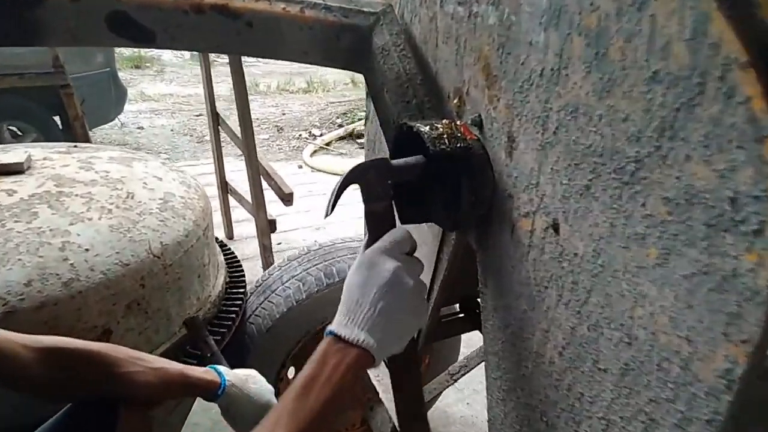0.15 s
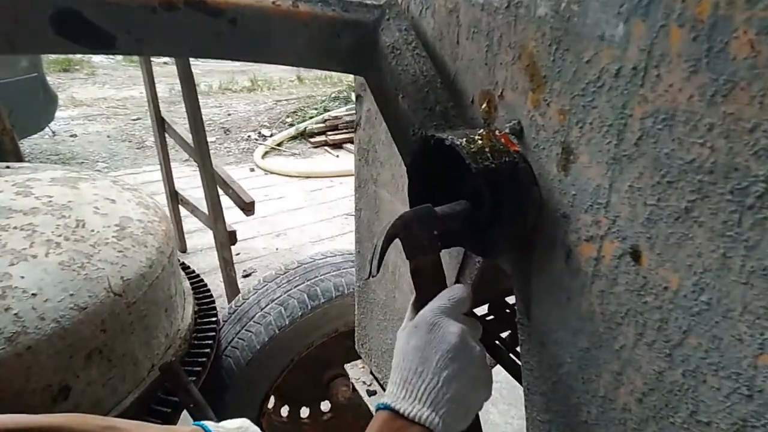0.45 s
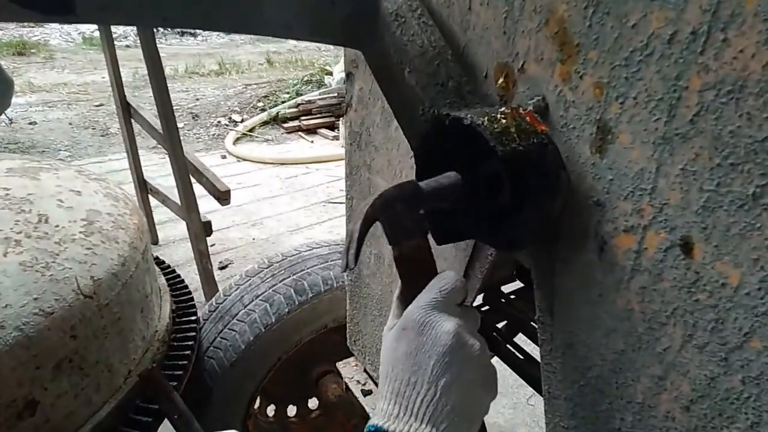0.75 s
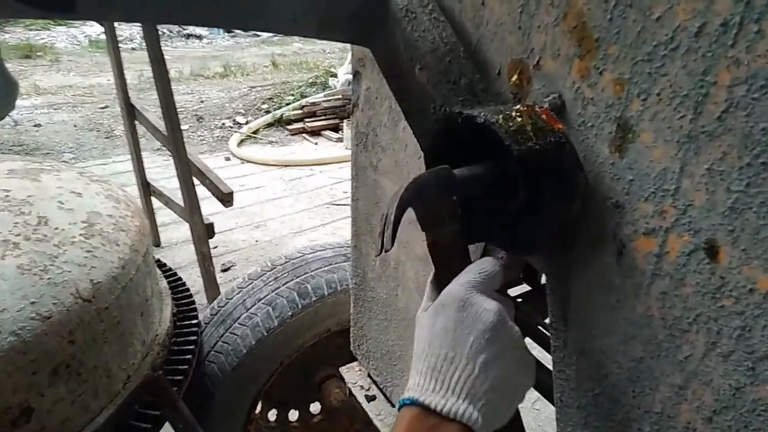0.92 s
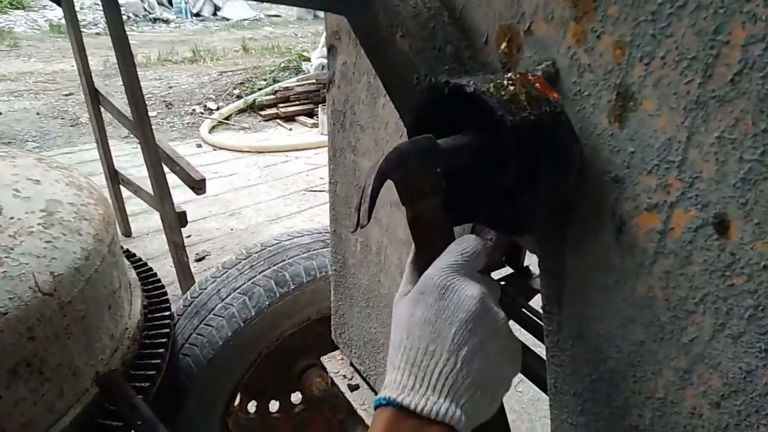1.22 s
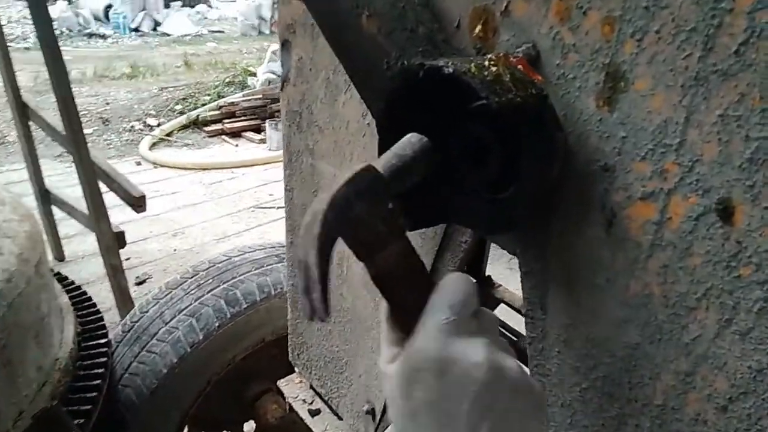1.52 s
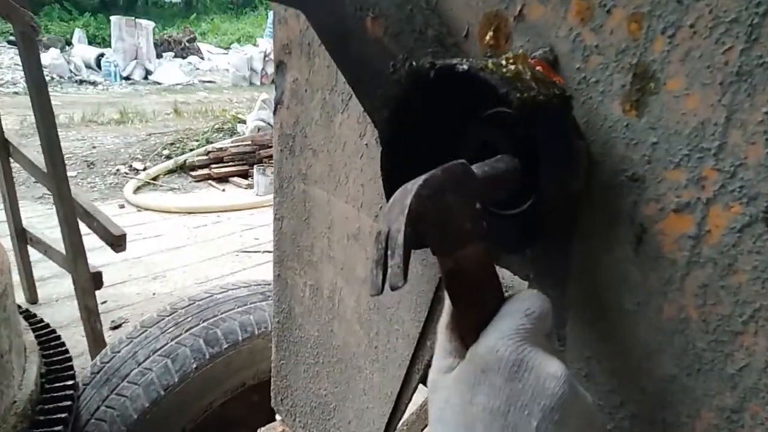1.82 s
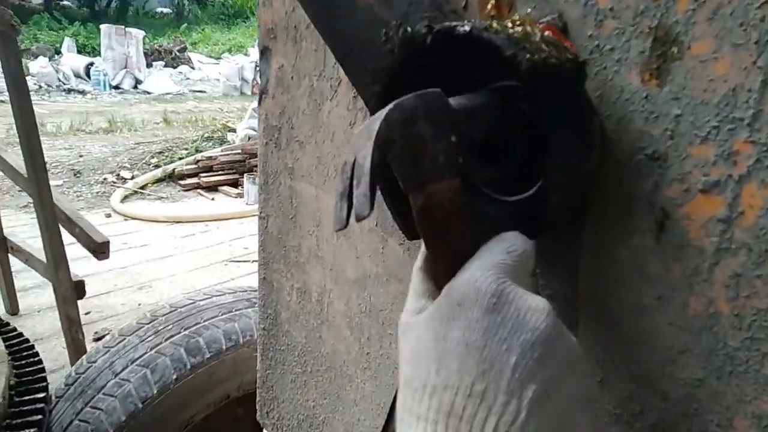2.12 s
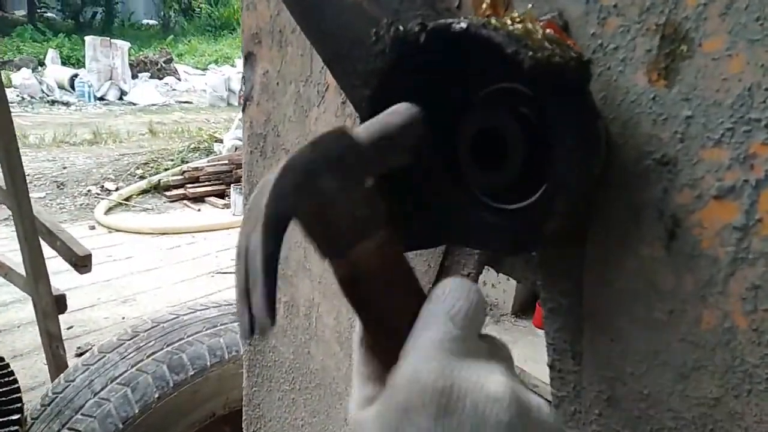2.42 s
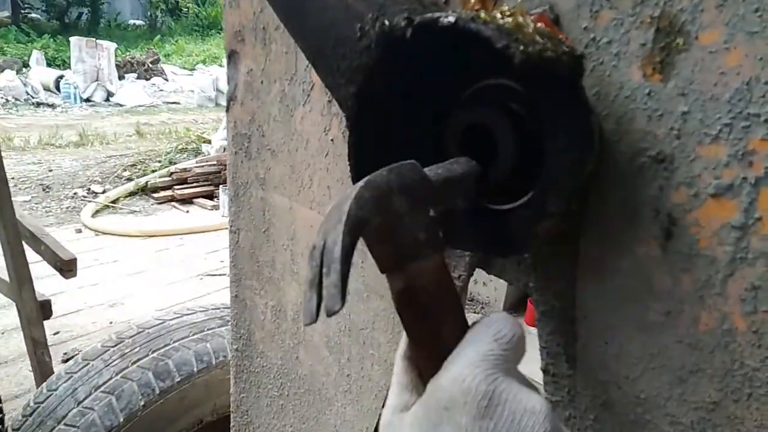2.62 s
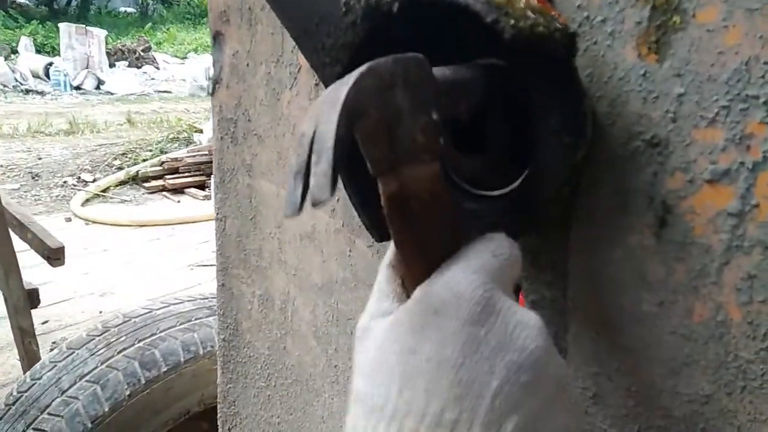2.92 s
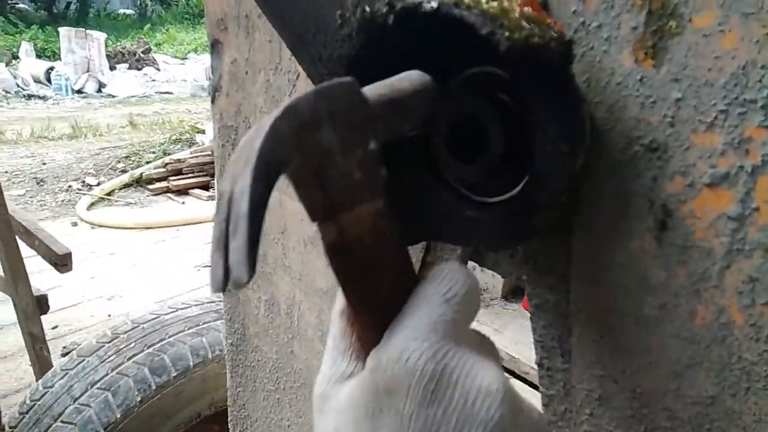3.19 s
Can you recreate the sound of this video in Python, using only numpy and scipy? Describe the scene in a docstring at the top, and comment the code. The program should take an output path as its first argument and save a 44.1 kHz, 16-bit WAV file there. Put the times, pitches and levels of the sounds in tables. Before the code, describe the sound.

A hammer drives a bearing into a steel housing with six sharp, clanging blows, each ringing briefly. The last ones come faster and add a high, pure note. Faint ticks and low outdoor rumble lie between them, heard close up.

```python
"""An outdoor yard, microphone hand-held close to a machine: a claw hammer drives a bearing into its housing.
We come in on the ring of one blow and six more follow. Each cracks, clangs in the steel housing,
buzzes the bearing's cage and sets the machine's plate wall booming; as the bearing seats, its race sings.
Loose steel ticks between the blows over a low rumble, the microphone takes three dull bumps,
and a limiter flattens every blow."""
import sys
import numpy as np
from scipy import signal
from scipy.fft import rfft, irfft, next_fast_len
from scipy.io import wavfile
from scipy.ndimage import uniform_filter1d, minimum_filter1d, map_coordinates

SR = 44100
rng = np.random.default_rng(int(sys.argv[2]) if len(sys.argv) > 2 else 0)


def waveform_to_disk(signal):
    """Save audio, clipped to [-1, 1], as 16-bit WAV at the path in sys.argv[1]."""
    frames = np.transpose(np.atleast_2d(signal))
    scaled = np.clip(frames, -1, 1) * 32767
    samples = np.round(scaled).astype(np.int16)
    wavfile.write(sys.argv[1], SR, samples)


N = 147735
T = np.arange(int(1.3 * SR)) / SR  # time since a contact [s]

# hammer blows, levels relative (time [s], strength [dB], clang [dB], boom [dB], bass [dB],
# brightness [dB], cage buzz [dB], bearing race [dB])
BLOWS = [(-.23, -5, 0, 6, -15.5, 1.5, -21, -73.5), (0.3562, -7, -11.5, 4.5, -6, -1, -18, -70),
         (0.9324, -4, -9, 3.5, -3.5, -3, -25, -62), (1.5938, -7, -10.5, 5, 1.5, -2, -22.5, -57.5),
         (2.1002, -5.5, -9, 3, 2, -3, -24.5, -28.5), (2.5061, -0.5, -9, 6, 2, -3, -20.5, -18),
         (2.8929, -6, -12, 2.5, 5.5, -3, -26, -14)]


def amp(db):
    """Decibels to gain."""
    return 10 ** (np.asarray(db) / 20)


def along(points, hz):
    """Read (frequency [Hz], value) points on a log frequency axis."""
    freqs, values = np.transpose(points)
    return np.interp(np.log(hz + 1), np.log(freqs + 1), values)


def filtered(x, response):
    """Filter x by a gain given as a function of frequency."""
    size = next_fast_len(len(x) + 8192)
    return irfft(rfft(x, size) * response(np.fft.rfftfreq(size, 1 / SR)), size)[:len(x)]


def noise(spectrum, size=len(T)):
    """Noise of rms 1, coloured by (frequency [Hz], level [dB]) points."""
    x = filtered(rng.standard_normal(size), lambda hz: amp(along(spectrum, hz)))
    return x / x.std()


def jitter(step):
    """A random line that takes a new course every step samples."""
    return np.interp(T, T[::step], rng.standard_normal(len(T[::step])))


def fade(t60, t=T):
    """A fall of 60 dB in t60 seconds."""
    return np.exp(-np.log(1000) * t / t60)


def mode(hz, t60):
    """One ringing partial at a random phase."""
    return np.sin(2 * np.pi * (hz * T + rng.random())) * fade(t60)


def add(track, at_s, sound):
    """Mix a sound in at a time that may lie before the start."""
    start = round(at_s * SR)
    part = sound[max(-start, 0):N - start]
    track[max(start, 0):][:len(part)] += part


def contact_crack():
    """The hammer face meets steel in a very short burst of treble."""
    # crack spectrum (frequency [Hz], level [dB])
    spectrum = [(500, -32), (4000, -20), (10000, 5), (15000, 21.5)]
    return amp(0.5) * noise(spectrum) * fade(t60=0.026)


def clang_ring(mode_hz, hold_s=0.015, scatter_db=5.5):
    """Many short steel modes, weighted anew by each blow and kept up briefly while the parts chatter."""
    # strength of the clang's modes (frequency [Hz], level [dB])
    spectrum = [(200, -2), (600, -7.5), (1050, 1), (1550, 3), (2300, -12), (3000, -8), (4400, -3),
                (5600, -12), (7200, -4.5), (8500, -0.5), (10500, -7.5), (13500, -3), (15500, -6)]
    t = T[:SR // 3]
    weight, phase = rng.standard_normal((2, len(mode_hz), 1))
    gains = amp(along(spectrum, mode_hz)[:, None] + scatter_db * weight)
    waves = np.sin(2 * np.pi * (mode_hz[:, None] * t + phase))
    ring = (gains * waves).sum(0) / np.sqrt(np.sum(gains ** 2) / 2)
    ring *= fade(t60=0.11, t=np.maximum(t - hold_s, 0))
    return np.pad(ring, (0, len(T) - len(t)))


def housing_ring():
    """The steel housing rings at the same pitches under every blow."""
    # housing modes (frequency [Hz], level [dB], t60 [s])
    modes = [(194, -33, 2.43), (513.5, -25, 1.07), (575, -27, 1.31), (727, -21.5, 0.93),
             (1029.5, -17, 0.65), (1060, -24, 0.92), (1580, -26.5, 0.74), (1682, -22, 0.57),
             (2200, -23.5, 0.24), (2324, -23.5, 0.55), (2620, -22, 0.31), (3044, -26.5, 0.21)]
    return sum(amp(db + rng.normal(0, 0.29)) * mode(hz, t60) for hz, db, t60 in modes)


def spot_clink(hz, spread_hz, t60):
    """A clink with a faint tail; loose contact jitters its pitch, and a wide spread makes a rough clank."""
    pitch_hz = hz + spread_hz * jitter(step=24)
    wave = np.sin(2 * np.pi * np.cumsum(pitch_hz) / SR)
    return wave * (fade(t60) + amp(-23) * fade(t60=0.88))


def plate_boom(ripple_db=4.5, full_ripple_hz=2000):
    """The wall's crowded modes: low ones build slowly and last longest, some high ones stand out by chance."""
    # plate wall spectrum (frequency [Hz], level [dB])
    spectrum = [(40, -15.5), (100, -7), (145, -10.5), (185, 1), (300, -7.5), (420, -6), (620, 2), (900, -3),
                (1500, -5.5), (2000, -8), (2350, -8.5), (2800, -13.5), (4200, -18.5), (5600, -22.5),
                (7500, -19.5), (10500, -25), (12000, -29.5), (13500, -28), (15500, -16.5)]
    # build-up of its modes (frequency [Hz], time constant [s])
    rise_times = [(200, 0.021), (700, 0.046), (2000, 0.0056)]
    # decay of its modes (frequency [Hz], t60 [s])
    ring_times = [(100, 1.34), (200, 1.323), (600, 0.89), (1200, 0.76), (2500, 0.56), (8000, 0.58),
                  (15000, 0.45)]
    hz, t, bands = signal.stft(noise(spectrum), SR, nperseg=512)
    rise = 1 - np.exp(-t / along(rise_times, hz)[:, None])
    decay = fade(along(ring_times, hz)[:, None], t)
    ripple = amp(ripple_db * rng.standard_normal(len(hz)))
    ripple = (ripple / ripple.mean()) ** np.minimum(hz / full_ripple_hz, 1)
    return signal.istft(bands * ripple[:, None] * rise * decay, SR, nperseg=512)[1][:len(T)]


def cage_buzz(grit_db=3):
    """The bearing's loose cage buzzes with a gritty treble."""
    # buzz spectrum (frequency [Hz], level [dB])
    spectrum = [(300, -50), (2500, -8), (3800, -4), (5000, -25), (7400, -28), (8300, 4), (9000, -1.5),
                (9900, -10.5), (12000, -15.5), (14000, -5), (15500, -41.5)]
    return noise(spectrum) * amp(grit_db * jitter(step=128)) * fade(t60=0.52)


def race_song(rise_s=0.0076):
    """The bearing's race sings one high, pure note."""
    return mode(hz=6920, t60=0.78) * (1 - np.exp(-T / rise_s))


def hammer(clang_modes=280, common_share=0.36):
    """Close up, each blow sounds wall, housing and bearing; a share of the boom is the same every time."""
    # resonances of the spot struck, a list per blow (frequency [Hz], spread [Hz], level [dB], t60 [s])
    spots = [
        [(1046, 72, -10, 0.37), (7990, 80, -21.5, 0.51)],
        [(1700, 34, -9.5, 0.24), (3605, 445, -20.5, 0.39)],
        [(659, 45, -17, 0.82), (1650, 70, -18.5, .25), (2290, 73, -14, 0.24), (4400, 250, -23.5, 0.15)],
        [(1054, 27, -12.5, 0.67), (2386, 89, -16, 0.31), (3630, 74, -11.5, 0.21), (4000, 290, -12, 0.19)],
        [(3790, 230, -16, 0.14), (4740, 147, -14, 0.13), (8070, 120, -19.5, 0.47)],
        [(2306, 35, -17, 0.41), (3880, 190, -14, .12), (4700, 92, -13.5, 0.16)],
        [(4750, 125, -15, 0.15), (8200, 475, -16, 0.39)],
    ]
    # treble shelf (frequency [Hz], share of the blow's brightness [ratio])
    treble_shelf = [(1500, 0.1), (8000, 0.78)]
    # bass shelf (frequency [Hz], share of the blow's bass [ratio])
    bass_shelf = [(300, 0.72), (700, 0.058)]
    out = np.zeros(N)
    common_boom = np.sqrt(common_share) * plate_boom()
    position = (np.arange(clang_modes) + rng.random(clang_modes)) / clang_modes
    mode_hz = 300 + (15780 - 300) * position ** 1.4  # denser at the low end
    for (at_s, db, clang_db, boom_db, bass_db, bright_db, buzz_db, race_db), spot in zip(BLOWS, spots):
        boom = amp(boom_db - 11.5) * (common_boom + np.sqrt(1 - common_share) * plate_boom())
        clang = amp(clang_db - 1.5) * clang_ring(mode_hz)
        body = filtered(boom + clang + contact_crack(),
                        lambda hz: amp(bright_db * along(treble_shelf, hz) + bass_db * along(bass_shelf, hz)))
        housing = housing_ring()
        clinks = sum(amp(level) * spot_clink(hz, spread_hz, t60) for hz, spread_hz, level, t60 in spot)
        bearing = amp(race_db) * race_song() + amp(buzz_db) * cage_buzz()
        add(out, at_s, amp(db) * (body + housing + clinks + bearing))
    return out


def hollow_swell(peak_s=0.15, width_s=0.076):
    """The middle of each ring swells again after the clang, in a hollow bloom."""
    # swell spectrum (frequency [Hz], level [dB])
    spectrum = [(100, -10), (190, 14), (280, -6.5), (480, 6), (700, 6), (1050, 5.5), (1600, -2),
                (4000, -41)]
    # swell after each blow in turn (relative level [dB])
    levels = [-6, -1, 4.5, -0.5, -2, 7, -0.5]
    out = np.zeros(N)
    bloom = np.exp(-((T - peak_s) / width_s) ** 2)
    for (at_s, *_), db in zip(BLOWS, levels):
        add(out, at_s, amp(db - 29) * noise(spectrum) * bloom)
    return out


def yard_rumble(level_db=-42.5, sway_db=2):
    """The open air of the yard: a low rumble whose level sways."""
    # rumble spectrum (frequency [Hz], level [dB])
    spectrum = [(25, 1), (60, -6), (120, -2.5), (200, -1), (350, -9.5), (620, -8.5), (1300, -18),
                (3000, -28), (5700, -41.5), (8400, -38), (10500, -45), (15500, -39)]
    sway = map_coordinates(rng.standard_normal(40), [np.linspace(0, 30, N)])
    return amp(level_db - sway_db * sway) * noise(spectrum, N)


def steel_ticks():
    """Loose steel makes light contacts, each with a faint ring."""
    # contacts (time [s], level [dB])
    ticks = [(.075, -51), (0.6677, -48.5), (0.771, -51.5), (0.8547, -51.5), (0.902, -54), (1.188, -47),
             (1.2976, -45), (1.3222, -47), (1.381, -50.5), (1.512, -44), (1.5633, -45), (1.9027, -46.5),
             (1.954, -47.5), (2.039, -49.5), (2.364, -43), (2.418, -47.5), (2.4669, -45.5), (2.745, -33),
             (2.766, -35), (2.822, -42), (2.85, -44), (3.222, -46.5), (3.278, -49)]
    # tick spectrum (frequency [Hz], level [dB])
    spectrum = [(500, -23), (2500, -5.5), (6000, -5), (8400, 3), (10500, -6.5), (15000, -1.5)]
    out = np.zeros(N)
    envelope = fade(t60=0.024) + amp(-9) * fade(t60=0.19)
    for at_s, db in ticks:
        add(out, at_s, amp(db) * noise(spectrum) * envelope)
    return out


def microphone_bumps(rise_s=0.0044):
    """Handling noise: soft, low thuds on the hand-held microphone."""
    # bumps (time [s], level [dB])
    bumps = [(0.579, -35.5), (1.203, -29), (1.567, -36.5)]
    # thud spectrum (frequency [Hz], level [dB])
    spectrum = [(15, -9), (45, 8), (130, -2.5), (250, -8), (800, -66)]
    out = np.zeros(N)
    envelope = 2 * (1 - np.exp(-T / rise_s)) * fade(t60=0.12)
    for at_s, db in bumps:
        add(out, at_s, amp(db) * noise(spectrum) * envelope)
    return out


def scene():
    """Everything at one microphone, close to the machine."""
    return (hammer() + hollow_swell() + steel_ticks() + microphone_bumps() + yard_rumble())[None]


def record(dry):
    """A limiter ducks at once, holds and recovers steadily; a steep low-pass takes off the very top."""
    limit_db, sense_s, hold_s, recover_db_per_s, top_hz = -18.5, 0.0041, 0.057, 41, 15780
    mic, hold = dry[0], int(hold_s * SR)
    power = np.abs(uniform_filter1d(mic ** 2, int(sense_s * SR)))
    level_db = 10 * np.log10(power + 1e-12)
    duck_db = minimum_filter1d(np.minimum(limit_db - level_db, 0), hold, origin=(hold - 1) // 2)
    recovery_db = recover_db_per_s * np.arange(N) / SR
    gain_db = np.minimum.accumulate(duck_db - recovery_db) + recovery_db
    limited = mic * amp(uniform_filter1d(gain_db, size=64))
    return filtered(limited, lambda hz: 1 / (1 + (hz / top_hz) ** 300))[None]


dry = scene()
out = record(dry)
waveform_to_disk(out)
```